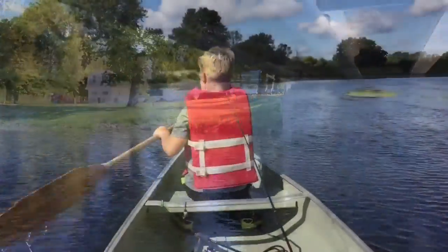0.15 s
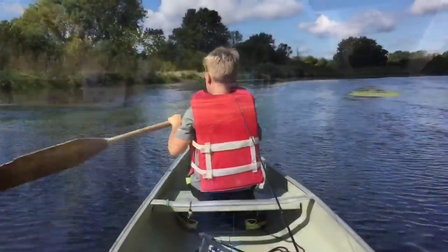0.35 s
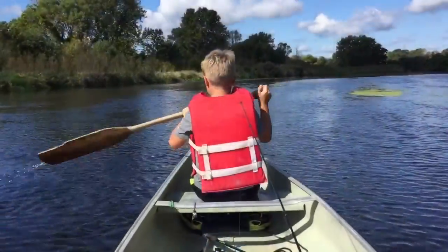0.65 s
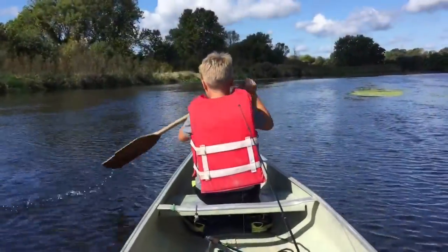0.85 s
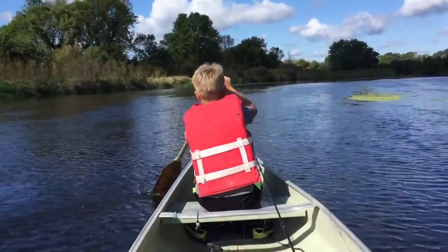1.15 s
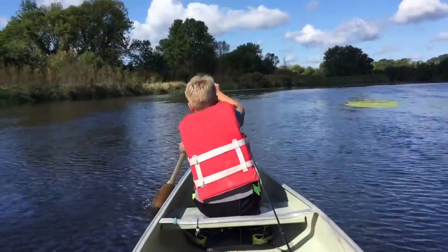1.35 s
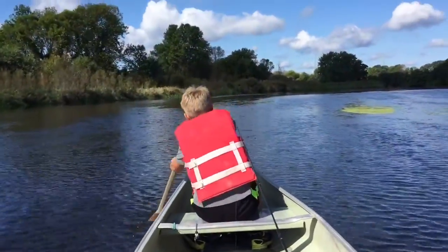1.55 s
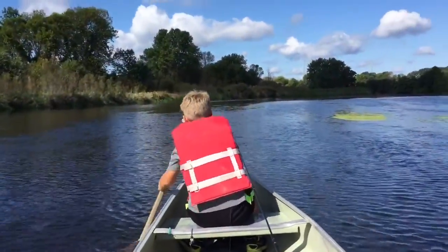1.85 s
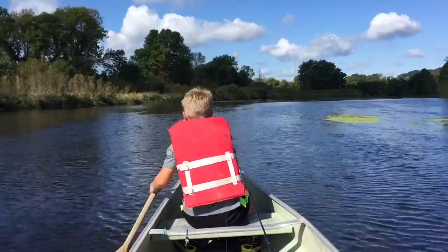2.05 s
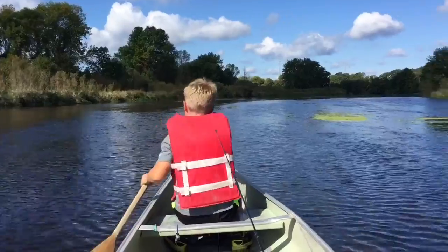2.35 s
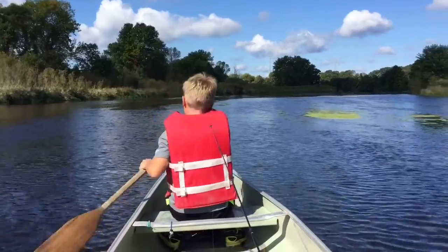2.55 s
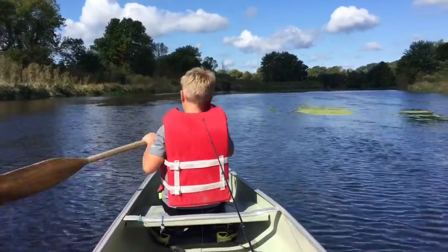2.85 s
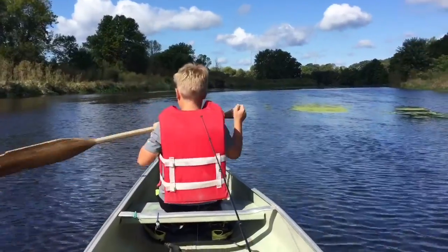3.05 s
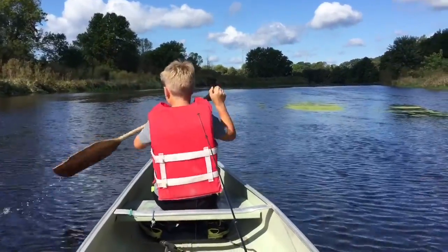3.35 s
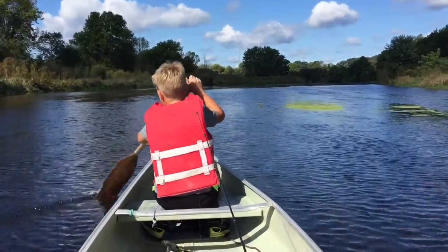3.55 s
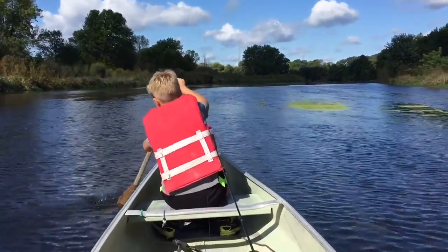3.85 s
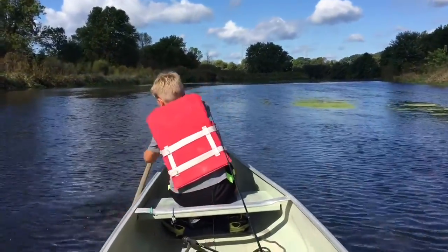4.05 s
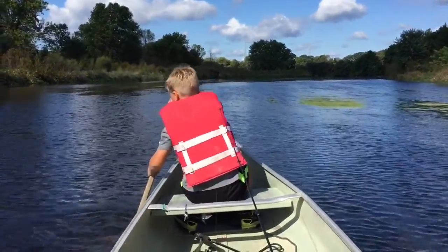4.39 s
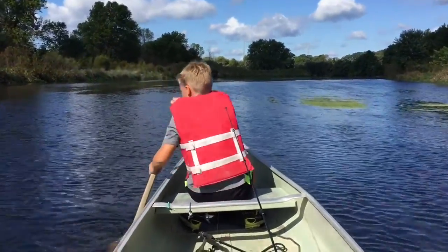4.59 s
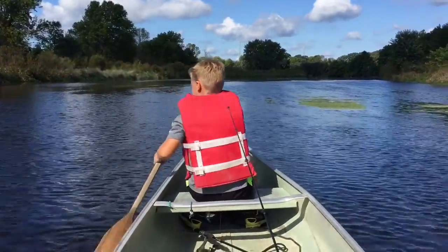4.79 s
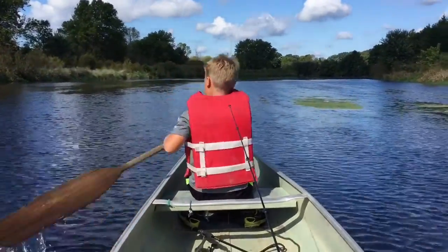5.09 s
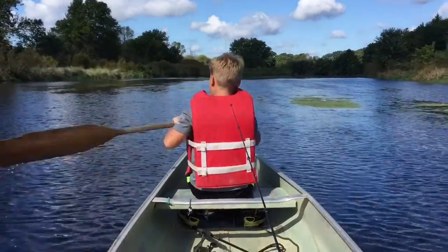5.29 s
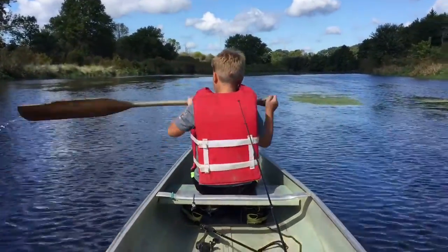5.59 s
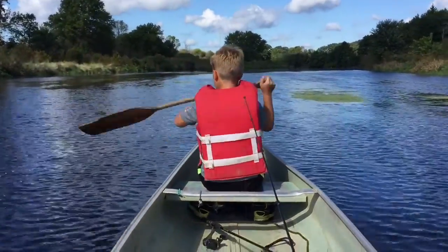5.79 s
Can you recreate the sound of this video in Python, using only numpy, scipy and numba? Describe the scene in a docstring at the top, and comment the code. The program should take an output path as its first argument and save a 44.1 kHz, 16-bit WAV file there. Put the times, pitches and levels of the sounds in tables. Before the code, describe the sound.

A paddler works a canoe on a breezy river. Dull gusty thuds buffet the microphone; small bubbly slaps and drips cluster along the hull, densest early on. The middle grows calmer, leaving sparse drops and the steady throbbing hiss of bank insects. Later come more thuds, a tiny squeak and a fresh run of watery plops. Outdoor, dry, mono, handheld phone.

```python
"""A canoe drifts down a river on a breezy day; a phone in the stern is buffeted by wind.
From the start, eddies thud over a turbulent rumble while water slaps and trickles along the hull and
off the paddle, as clusters of damped bubble tones with hiss. Thuds and slaps thin out after 3 s, a faint
harmonic squeak sounds at 4.5 s, and slaps return before 5 s. Throughout, insect choruses hiss from the
banks as throbbing bands of noise, with a chirping cricket and a faint bed of air noise."""
import sys
import numpy as np
from scipy import signal
from scipy.fft import rfft, irfft
from scipy.io import wavfile
from scipy.ndimage import uniform_filter1d
from numba import njit

SR = 44100
rng = np.random.default_rng(int(sys.argv[2]) if len(sys.argv) > 2 else 0)


def transcribe(signal):
    """Save signal, clipped to [-1, 1], as a 16-bit WAV file at the path in sys.argv[1]."""
    frames = np.atleast_2d(signal).T
    limited = np.clip(frames, -1, 1)
    pcm = np.round(limited * 32767).astype(np.int16)
    wavfile.write(sys.argv[1], SR, pcm)


N = 261405
T = np.arange(N) / SR

# single eddies thudding on the port: start_s, level_db, pitch_hz (nominal), snap_db (relative to level_db)
EDDIES = [(0.071, -31, 78, -6), (0.145, -23.5, 103, -9), (0.195, -32.5, 102, -2.5), (0.321, -23.5, 76, -15),
          (0.354, -23.5, 147, -9), (0.382, -13, 101, -18), (0.5, -34.5, 110, -15), (0.581, -24, 76.5, -10),
          (0.619, -15.5, 140, -5.5), (0.675, -31, 120, -3.5), (0.717, -25.5, 89, -10),
          (0.743, -24, 109, -29), (0.844, -21.5, 81, 2), (0.874, -18, 75, -26), (0.942, -31.5, 77.4, -29),
          (0.999, -32.5, 79.4, -20), (1.05, -31, 101, -14), (1.104, -18.5, 96.5, -13),
          (1.135, -18, 77, -8.5), (1.154, -19, 77.4, -0.5), (1.171, -15, 82, -3.8), (1.241, -16, 80, -15),
          (1.306, -14, 160, -29), (1.348, -13.5, 121, -14), (1.362, -17.5, 80, -4),
          (1.541, -27.5, 75, -4.5), (1.587, -26.5, 110, -2), (1.612, -16, 116, -11), (1.645, -16, 77, -5.5),
          (1.694, -19.5, 74, -3), (1.735, -29.5, 89, -7), (1.983, -23, 81.5, -6), (2.025, -16.5, 83, -11),
          (2.101, -12.5, 90, -1.8), (2.134, -14.5, 112, 0.8), (2.165, -19.5, 79, -56),
          (2.241, -21, 78, -11.5), (2.287, -18, 77, -19), (2.371, -20.5, 78, -44), (2.44, -21.5, 86, -17),
          (2.562, -29.5, 145, -36), (2.6, -24.5, 89, -25), (2.662, -20.5, 81, -9.5),
          (2.737, -14, 80, -14.5), (2.77, -14, 187, -10), (2.807, -24.5, 110, -2.5),
          (2.832, -25.5, 78, 1.1), (2.982, -37, 137, 5.5), (2.997, -28.5, 135, 5.7),
          (3.041, -25.5, 128, -8), (3.129, -32, 98, -20), (3.546, -33.5, 79.5, -27), (3.652, -29, 80, -8),
          (3.989, -29.5, 75.4, -22), (4.038, -26.5, 89, -10.5), (4.136, -26.5, 118, -6.5),
          (4.254, -24.5, 94.2, -19), (4.323, -12, 140, -9.5), (4.462, -22.5, 81, -17),
          (4.531, -23.5, 117, -5.5), (4.563, -20, 78.1, -33), (4.619, -22.5, 80.7, -15),
          (4.651, -21, 78.5, -16), (4.756, -23, 103, -28), (4.795, -23.5, 80, -33), (5, -26, 124, -9.5),
          (5.032, -21.5, 78.6, -13), (5.09, -13, 146, -3.5), (5.217, -25, 121, -31),
          (5.251, -24.5, 91, -25), (5.522, -35, 72, -37), (5.744, -29.5, 74, -30), (5.87, -34.5, 72, -12)]
# slaps and drips: start_s, level_db (nominal), pitch_hz (first bubble), roughness (0 smooth, 1 rough)
SLAPS = [(0.253, -28.5, 1750, 0.4), (0.287, -34, 2260, 0.5), (0.302, -30, 2750, 0.23),
         (0.329, -30, 1270, 0.82), (0.394, -26, 800, 0.85), (0.441, -30, 1500, 0.37),
         (0.465, -34.5, 1510, 0.66), (0.48, -31, 2150, 0.46), (0.515, -27.5, 1406, 0.1),
         (0.578, -20.5, 1210, 0.24), (0.647, -21.5, 1680, 0.37), (0.679, -36, 1670, 0.3),
         (0.734, -33.5, 1330, 0.4), (0.747, -36, 2500, 0.1), (0.776, -33, 1414, 0.29),
         (0.912, -36, 5130, 0.54), (1.015, -37, 505, 0.45), (1.021, -41, 3860, 0.9),
         (1.047, -35, 2070, 0.28), (1.103, -32.5, 2900, 0.5), (1.116, -28, 2650, 0.52),
         (1.199, -43, 730, 0.5), (1.209, -31.5, 2300, 0.4), (1.236, -27, 1420, 0.63),
         (1.277, -37, 1080, 0.7), (1.367, -34.5, 2500, 0.73), (1.444, -34.5, 2000, 0.15),
         (1.894, -30.5, 3460, 0.7), (1.951, -31, 1370, 0.54), (1.996, -26.5, 1430, 0.52),
         (2.002, -20.5, 900, 0.71), (2.035, -28.5, 920, 0.1), (2.134, -33.5, 763, 0.48),
         (2.227, -43, 1224, 0.37), (2.341, -27.5, 3570, 0.54), (2.345, -40.5, 594, 0.46),
         (2.388, -39, 726, 0.44), (2.432, -31.5, 1930, 0.37), (2.447, -26.5, 728, 0.42),
         (2.551, -33.5, 790, 0.3), (2.572, -39, 880, 0.48), (2.591, -23.5, 1930, 0.52),
         (2.601, -26.5, 1710, 0.26), (2.679, -31, 1780, 0.52), (2.762, -37, 850, 0.7),
         (2.802, -29, 1320, 0.73), (2.832, -21.5, 1526, 0.58), (2.868, -32, 958, 0.2),
         (2.929, -36, 2320, 0.65), (2.959, -35, 1660, 0.87), (3.059, -32.5, 1300, 0.17),
         (3.12, -41, 4240, 0.56), (3.138, -37, 1720, 0.8), (3.197, -24, 1504, 0.64),
         (3.42, -35.5, 686, 0.25), (3.449, -38, 4400, 0.57), (3.581, -34.5, 3530, 0.71),
         (3.636, -33, 1580, 0.76), (3.656, -31, 2130, 1.09), (3.685, -37.5, 1930, 0.8),
         (3.706, -36, 2960, 0.63), (3.722, -36, 572, 0.4), (3.795, -43.5, 1370, 0.7),
         (3.931, -49, 890, 0.4), (4.001, -31.5, 1770, 1.01), (4.711, -36, 3200, 0.2),
         (4.758, -38, 1740, 0.35), (4.898, -41, 904, 0.36), (4.92, -35, 2330, 0.3), (5.02, -33, 835, 0.3),
         (5.025, -29.5, 2820, 0.28), (5.069, -39.5, 1880, 0.72), (5.208, -35.5, 2130, 0.7),
         (5.229, -28.5, 1020, 0.13), (5.265, -29.5, 1730, 0.32), (5.301, -39, 1840, 0.33),
         (5.34, -41, 2360, 0.9), (5.357, -32.5, 1080, 0.81), (5.389, -21, 2460, 0.38),
         (5.448, -30, 3010, 0.47), (5.482, -33.5, 3700, 0.68), (5.505, -40, 2100, 0.47),
         (5.745, -34.5, 4600, 0.52), (5.655, -39.5, 1440, 0.53), (5.798, -31.5, 1640, 0.62)]


def amp(db):
    """Decibel definition: 20 dB is a factor of ten in amplitude."""
    return 10 ** (np.asarray(db) / 20)


def unit(x):
    """Normalisation to a root-mean-square value of 1."""
    return x / np.sqrt(np.mean(x ** 2))


def curves(table):
    """Linear interpolation: the columns after time, as one value per sample."""
    s, *columns = np.transpose(table)
    return [np.interp(T, s, c) for c in columns]


def noise(lo_hz, hi_hz, order=2):
    """Subtractive synthesis: white noise through a band-pass filter, rms 1."""
    sos = signal.butter(order, [lo_hz, hi_hz], "band", fs=SR, output="sos")
    return unit(signal.sosfilt(sos, rng.standard_normal(N)))


def coloured(spectrum):
    """Spectral shaping: white noise weighted by (frequency_hz, density_db) points, rms 1."""
    hz, db = np.transpose(spectrum)
    f = np.maximum(np.fft.rfftfreq(N, 1 / SR), 1)
    gain = amp(np.interp(np.log(f), np.log(hz), db))
    return unit(irfft(rfft(rng.standard_normal(N)) * gain, N))


def walk(rate_hz):
    """Slow random modulation: levels held 1 / rate_hz seconds and smoothed twice, standard deviation 1."""
    hold = int(SR / rate_hz)
    steps = np.repeat(rng.standard_normal(N // hold + 1), hold)
    x = uniform_filter1d(uniform_filter1d(steps, hold), hold)[:N]
    return x / x.std()


def around(events, level_db, rise_s, fall_s):
    """Addition of incoherent powers: each event adds a Gaussian rise and an exponential decay."""
    power = np.zeros(N)
    for s, db, *_ in events:
        i, j = max(int((s - 6 * rise_s) * SR), 0), int((s + 6 * fall_s) * SR)
        t = T[i:j] - s
        decay = np.where(t < 0, (t / rise_s) ** 2, 2 * t / fall_s)
        power[i:j] += amp(2 * (db + level_db) - 8.69 * decay)  # 8.69 dB is a factor e in amplitude
    return power


@njit
def bubbles(n, at, step, cycles, size, glide):
    """Bubble resonance: damped sines whose pitch rises as the bubble nears the surface."""
    out = np.zeros(n)
    for k in range(len(at)):
        w = step[k]  # radians per sample
        phase = 0.
        life = cycles[k] * 2 * np.pi / step[k]  # decay time in samples
        for j in range(min(int(5 * life), n - at[k])):
            phase += w
            w *= 1 + glide / life
            attack = min(j / (.2 * life), 1.)
            out[at[k] + j] += size[k] * np.sin(phase) * np.exp(-j / life) * attack
    return out


def wind_rumble():
    """Turbulent pressure fluctuation: fluttering bands of noise, with a brighter balance in gusts."""
    # steady breeze between the eddies: time_s, rumble_db
    breeze = [(0.0, -47.5), (1.1, -49), (1.32, -40.5), (1.58, -36), (1.75, -71), (1.98, -31), (2.18, -43),
              (2.44, -54), (2.71, -35), (2.85, -57), (3.32, -41), (3.98, -48), (4.62, -47), (5.1, -43),
              (5.38, -49.5), (5.93, -49)]
    # quick, high eddies stir less rumble: -3 dB per octave above 80 Hz
    stirring = [(s, db - 3 * np.log2(hz / 80)) for s, db, hz, _ in EDDIES]
    stirred = around(stirring, level_db=-12.5, rise_s=0.021, fall_s=0.041)
    db = 10 * np.log10(amp(2 * curves(breeze)[0]) + stirred)
    low = noise(38.4, 105.6, order=3) * amp(db + 3.7 * walk(30))
    # faster air sheds smaller eddies, so the upper bands grow more steeply
    middle = noise(109, 220, order=4) * amp(-49.5 + 1.49 * (db + 36.5) + 8.06 * walk(40))
    upper = noise(201, 454, order=5) * amp(-64 + 1.97 * (db + 35.5) + 4.45 * walk(60))
    return low + middle + upper


def eddy_thuds():
    """Vortex impact: each eddy is a short pressure swing that slows down, with a higher snap."""
    swing_cycles, snap_cycles = 1.36, 2.07  # nominal periods per unit of envelope time
    out = np.zeros(N)
    turns = rng.random((len(EDDIES), 2))  # starting phases in cycles
    for (s, level_db, hz, snap_db), (swing_turn, snap_turn) in zip(EDDIES, turns):
        i = int(s * SR)
        t = T[:min(round(.16 * SR), N - i)]
        x = t * hz / swing_cycles
        swing_phase = swing_turn + hz * t * (0.69 + 0.81 * np.exp(-x))
        swing = x ** 1.135 * np.exp(1 - x ** 2.9) * np.cos(2 * np.pi * swing_phase)
        # a louder snap is higher: 0.025 octaves per dB
        snap_hz = 386.4 * 2 ** (.025 * (level_db + snap_db + 28.5))
        y = t * snap_hz / snap_cycles
        snap_phase = snap_turn + snap_hz * t * (0.54 + 1.24 * np.exp(-y))
        snap = y ** 3 * np.exp(1 - y ** 3) * np.cos(2 * np.pi * snap_phase)
        out[i:][:len(t)] += amp(level_db) * (swing + amp(snap_db) * snap)
    return out


def spray(white, t, hz, db, rough, length_s):
    """Broadband radiation: a noise band around the bubble pitch that starts hard and dies out."""
    edges = np.minimum(hz * 2 ** (1.123 * rough * np.array([-1, 1])), 9000)
    band = signal.butter(3, edges, "band", fs=SR, output="sos")
    hiss = unit(signal.sosfilt(band, white))[:len(t)]
    shape = 1.5 * np.exp(-t / 0.00054) + np.exp(-t / (0.46 * length_s))
    attack = np.minimum(t / 0.00019, 1)
    return amp(db - 25 + 16.67 * rough) * shape * attack * hiss


def impact_tick(t, hz, db, rough):
    """Impulsive impact: a brief bright sine burst, disproportionately strong in hard slaps."""
    z = t * hz / 1.2
    tick = np.sin(2 * np.pi * 1.23 * hz * t) * z ** 2 * np.exp(1 - z ** 2)
    return amp(db - 3.5 + .6 * (db + 21.5) - 9.4 * rough) * tick


def splashes(count=7):
    """Air entrainment: a slap frees bubbles and spray; a rough one spreads wider, longer and hissier."""
    s, db, hz, rough = np.transpose(SLAPS)[:, :, None]
    late, off, weak, ring = np.moveaxis(rng.random((len(SLAPS), count, 4)), 2, 0)
    # the first bubble of each cluster has the tabled pitch
    late[:, 0], off[:, 0], weak[:, 0] = 0, .5, 0
    rough = np.clip(rough, .05, 1.3)
    length_s = 0.03 * (0.35 + 1.2 * rough)
    # big, low bubbles tend to close last
    pitch = np.clip(hz * 2 ** (rough * (1.56 * (off - .5) - 0.3 * late)), 300, 8000)
    # bubbles follow the impact by 5 ms or more
    at = np.minimum((s + .005 + length_s * late) * SR, N - 1).astype(np.int64)
    size = amp(db - 7.5 - 12.0 * weak - 18 * late)
    cycles = (4 + 5 * ring) * (pitch / 1500) ** .6
    step = 2 * np.pi * pitch / SR
    out = bubbles(N, at.ravel(), step.ravel(), cycles.ravel(), size.ravel(), 0.013)
    for k, white in enumerate(rng.standard_normal((len(s), round(.16 * SR)))):
        i = int(s[k, 0] * SR)
        t = T[:min(len(white), N - i)]
        slap = hz[k, 0], db[k, 0], rough[k, 0]
        out[i:i + len(t)] += spray(white, t, *slap, length_s[k, 0]) + impact_tick(t, *slap)
    return out


def trickle(count=1500):
    """Superposed bubble resonances: unequal small bubbles in a smooth wash, stronger around the slaps."""
    # steady trickling along the hull: time_s, level_db (nominal)
    steady_level = [(0.0, -58), (0.3, -53.5), (0.46, -58), (0.86, -62.5), (1.34, -59), (1.75, -64),
                    (2.08, -60), (2.28, -66.5), (2.77, -48.5), (3.02, -52.5), (3.38, -61), (4.46, -67.5),
                    (5.37, -54.5), (5.56, -64), (5.93, -57.5)]
    # relative spectrum of the trickle: frequency_hz, density_db (per hertz)
    tone_colour = [(450, -1), (750, -8.5), (1100, -7), (1700, -4.5), (2800, -10), (4600, -9), (8000, -12.5)]
    when, tone, loud, ring = rng.random((count, 4)).T
    hz, tone_db = np.transpose(tone_colour)
    pitch = 600 * 5.5 ** tone
    # pitches even in octaves thin out per hertz, so power is raised with pitch
    density_db = np.interp(np.log(pitch), np.log(hz), tone_db) + 10 * np.log10(pitch)
    size = amp(density_db + 10.5 * loud ** 3)
    cycles = (5 + 8 * ring) * (pitch / 1500) ** .5
    at = (when * N).astype(np.int64)
    grains = unit(bubbles(N, at, 2 * np.pi * pitch / SR, cycles, size, 0.016))
    wash = coloured(tone_colour) * amp(3.1 * walk(19))
    steady = amp(2 * curves(steady_level)[0])
    # water running off after each slap
    runoff = around(SLAPS, level_db=-29.5, rise_s=0.0084, fall_s=0.05)
    return wash * np.sqrt(.6 * steady + .12 * runoff) + grains * np.sqrt(.3 * steady + .9 * runoff)


def squeak():
    """Harmonic series with a missing fundamental: a thin stack whose partials waver separately."""
    # partials of the squeak: harmonic_number, level_db (relative)
    partials = [(2, -11), (3, -5), (4, 0.5), (5, -12)]
    start_s, length_s, rise_s, fall_s = 4.545, .2, 0.0065, 0.059
    t = T - start_s
    sag = .1 * np.clip(.1 - t, -.1, .1)
    hz = 853 * (1 + sag + 0.004 * walk(86) + .007 * walk(25))
    phase = 2 * np.pi * np.cumsum(hz) / SR
    stack = sum(amp(db + 4 * walk(30)) * np.sin(round(k) * phase) for k, db in partials)
    # a 9 dB dip at 85 ms makes it swell twice
    db = -58 - 9 * np.exp(-((t - .085) / .025) ** 2)
    envelope = np.clip(np.minimum(t / rise_s, (length_s - t) / fall_s), 0, 1)
    return stack * amp(db) * envelope


def insect_choruses():
    """Amplitude modulation: three noise bands, each of many singers, throb at a wavering rate."""
    # common swell of the choruses: time_s, level_db
    common_swell = [(0.0, -54.5), (0.66, -50.5), (2.53, -50.5), (2.62, -48), (2.77, -52.5), (2.95, -48.5),
                    (5.2, -48.5), (5.65, -47), (5.93, -48.5)]
    # choruses: low_hz, high_hz, throb_hz, throb_depth (0-1), flicker_db, share_db (relative), swell_db (own)
    singers = [(5050, 5857, 210, 0.23, 1.5, -10, 1.06), (6590, 8774, 58, 0.11, 1, -4, 0.4),
               (11090, 17600, 63, 0.36, 1.5, -2, 1.5)]
    out, db = 0, curves(common_swell)[0]
    for lo_hz, hi_hz, throb_hz, depth, flicker_db, share_db, swell_db in singers:
        beat = np.sin(2 * np.pi * np.cumsum(throb_hz * (1 + 0.0669 * walk(6.6))) / SR)
        mid_hz = np.sqrt(lo_hz * hi_hz)
        # lower and higher singers flicker on their own
        lower = noise(lo_hz, mid_hz, order=4) * amp(flicker_db * walk(16))
        higher = noise(mid_hz, hi_hz, order=4) * amp(flicker_db * walk(16))
        out = out + unit(lower + higher) * (1 + depth * beat) * amp(db + share_db + swell_db * walk(4.22))
    return out


def lone_cricket():
    """Periodic amplitude modulation: half-wave pulses of a narrow noise band over a steady remainder."""
    # the cricket, a single row: centre_hz, width_hz, level_db (nominal), chirp_rate_hz
    cricket = (4211, 195, -74.5, 26.5)
    hz, width_hz, db, rate_hz = cricket
    chirp = 0.29 + np.maximum(np.sin(2 * np.pi * rate_hz * T), 0)
    return noise(hz - width_hz / 2, hz + width_hz / 2) * chirp * amp(db + 0.99 * walk(2.1))


def air_noise():
    """Coloured noise: a faint broadband bed with a slightly varying level."""
    # relative spectrum of the air: frequency_hz, density_db (per hertz)
    air_spectrum = [(180, -36), (300, -46), (784, -20), (3100, -1.5), (4100, 9.5), (4610, 2), (5260, -18),
                    (6100, 9.5), (6970, 14.5), (7950, -27), (9540, 7.5), (12200, 8.5), (15700, 8.5)]
    return coloured(air_spectrum) * amp(-56.5 + .8 * walk(5))


def scene():
    """Linear superposition of all the sources, as one channel."""
    wind = wind_rumble() + eddy_thuds()
    water = splashes() + trickle()
    insects = insect_choruses() + lone_cricket()
    return (wind + water + squeak() + insects + air_noise())[None]


def record(dry):
    """Band limitation: the phone cuts the deepest bass and the top."""
    bass_cut = signal.butter(4, 42.2, "high", fs=SR, output="sos")
    top_cut = signal.ellip(18, .3, 80, 15700, fs=SR, output="sos")  # 0.3 dB ripple, 80 dB rejection
    return signal.sosfilt(top_cut, signal.sosfilt(bass_cut, dry))


dry = scene()
out = record(dry)
transcribe(out)
```